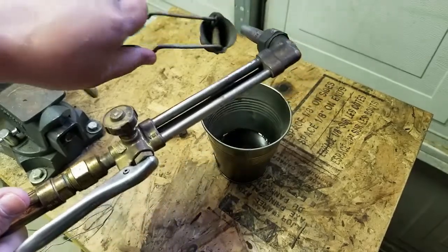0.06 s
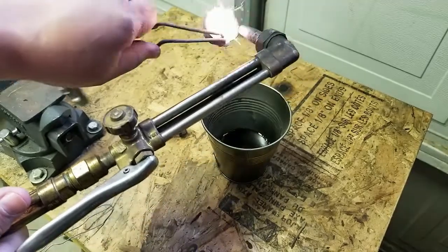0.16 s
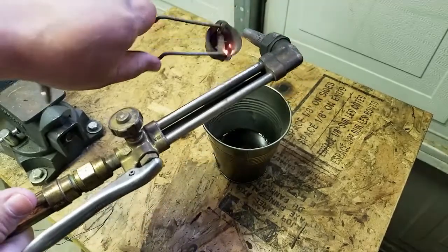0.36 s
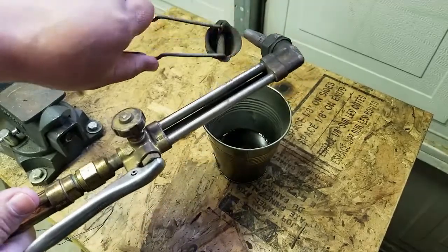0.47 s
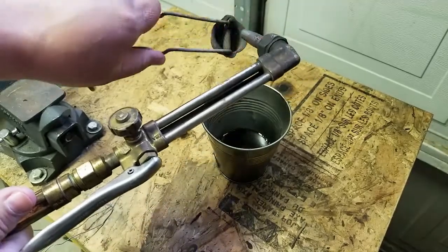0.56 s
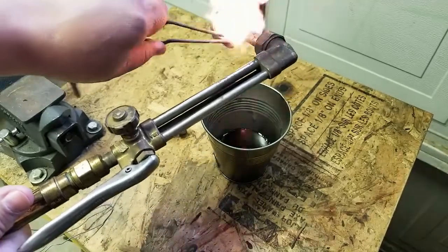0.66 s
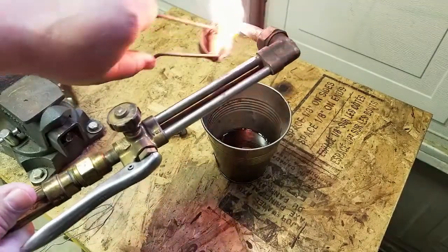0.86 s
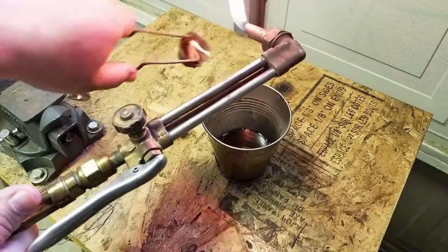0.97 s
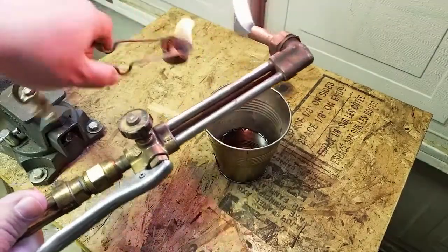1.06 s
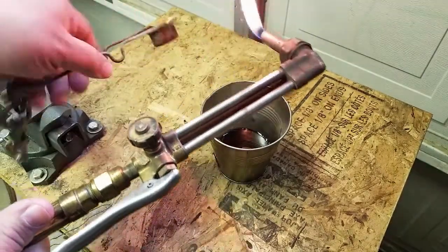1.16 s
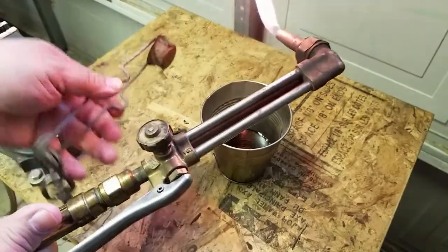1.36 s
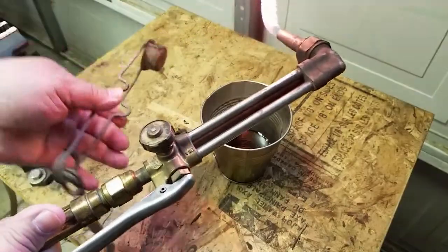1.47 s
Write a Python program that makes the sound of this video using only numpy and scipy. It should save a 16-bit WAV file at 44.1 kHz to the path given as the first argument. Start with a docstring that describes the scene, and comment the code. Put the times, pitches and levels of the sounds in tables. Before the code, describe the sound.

A flint striker scrapes and springs back twice with sharp, ringing metallic clicks. The second squeeze lights a faintly hissing gas torch with a soft puff, then the striker rattles lightly, close by in a workshop.

```python
"""A flint striker, squeezed and released twice at the tip of a gas torch over a workshop bench.
Each stroke drags the flint across a small file; the cup and wire handle ring where the flint catches.
The second squeeze lights the hissing gas with a soft puff, and the striker rattles as it is drawn away.
Heard close on a stereo pair, a little left of centre, with bench reflections and low room tone behind."""
import sys
import numpy as np
from scipy import signal
from scipy.fft import rfft, irfft
from scipy.io import wavfile

SR = 44100
rng = np.random.default_rng(int(sys.argv[2]) if len(sys.argv) > 2 else 0)


def transcribe(u):
    """Save the signal u as a 16-bit wav file named by the first command-line argument.

    u: samples, shape (n,) or (channels, n), limited to [-1, 1]; the rate is SR.
    q: integer samples, one column per channel.
    """
    v = np.clip(np.atleast_2d(u).T, -1, 1)
    q = np.round(v * 32767).astype(np.int16)
    wavfile.write(sys.argv[1], SR, q)


N = 66150
T = np.arange(N) / SR

# spectrum of small flint and steel contacts (frequency [Hz], level [dB])
CONTACT_SPECTRUM = [(200, -32), (1200, -21.5), (2500, -11), (4300, -2.5), (6200, -3.5), (8000, 0),
                    (10500, -3), (12200, 1.5), (15700, -1)]


def amp(db):
    """Decibels to gain."""
    return 10 ** (np.asarray(db) / 20)


def unit(x):
    """Scales to rms 1."""
    return x / np.sqrt(np.mean(x ** 2) + 1e-20)


def read(points, hz):
    """Interpolates a table on a log-frequency axis."""
    f, value = np.transpose(points)
    return np.interp(np.log(hz + 1), np.log(f + 1), value)


def level(points):
    """Gain over time from a dB curve."""
    return amp(np.interp(T, *np.transpose(points)))


def add(mix, start_s, sound):
    """Mixes a sound in at a time."""
    part = mix[round(start_s * SR):][:len(sound)]
    part += sound[:len(part)]


def colour(x, spectrum, size=4096):
    """Applies a causal filter of unit energy with the given spectrum."""
    log_gain = np.log(amp(read(spectrum, abs(np.fft.fftfreq(size, 1 / SR)))))
    minimum_phase = np.exp(np.conj(signal.hilbert(log_gain)))
    taps = np.fft.ifft(minimum_phase).real[:size // 2]
    return signal.fftconvolve(x, taps / np.linalg.norm(taps))[:len(x)]


def noise(spectrum):
    """Steady coloured noise of rms 1."""
    gain = amp(read(spectrum, np.fft.rfftfreq(N, 1 / SR)))
    return unit(irfft(rfft(rng.standard_normal(N)) * gain, N))


def resonate(x, hz, width_hz, stages=1):
    """Passes a sound through equal resonances in series, each of gain 1."""
    r = np.exp(-np.pi * width_hz / SR)
    for _ in range(stages):
        x = 2 * signal.lfilter([1 - r], [1, -r * np.exp(2j * np.pi * hz / SR)], x).real
    return x


def room_tone(side_db=-22):
    """Low rumble of the workshop, nearly the same at both microphones."""
    # colour of the rumble (frequency [Hz], level [dB])
    spectrum = [(20, -10.5), (42, -7.5), (62, 4.5), (95, -3), (130, -4), (180, -12.5), (260, -14.5),
                (400, -32.5), (900, -31.5), (3000, -53.5)]
    # its rise and fall (time [s], level [dB])
    swell = [(0, -53.5), (.13, -56.5), (.19, -50.5), (.3, -52.5), (.6, -63.5), (.85, -59.5), (1.0, -65.5),
             (1.15, -69.5), (1.29, -60.5), (1.5, -66.5)]
    mid = noise(spectrum)
    side = amp(side_db) * noise(spectrum) * np.array([[1], [-1]])
    return (mid + side) * level(swell)


def workshop(x, bench_db=1, bench_decay_s=.0045, room_db=-5.5, room_onset_s=.007):
    """Reflections at one microphone: quick ones from the bench, then the room's tail."""
    # decay of the room (frequency [Hz], t60 [s])
    decay = [(100, .4), (800, 0.21), (2500, 0.23), (5500, .29), (9000, .26), (15000, 0.15)]
    t = T[:SR // 2]
    taps = rng.choice([-1, 1], len(t)) * (rng.random(len(t)) < 1 / 8)
    bench = taps * np.exp(-t / bench_decay_s) * (t > 1 / 2000)
    hz, age, bands = signal.stft(rng.standard_normal(len(t)), SR, nperseg=256)
    bands *= amp(-60 * age / read(decay, hz)[:, None])
    tail = signal.istft(bands, SR, nperseg=256)[1][:len(t)]
    tail *= 1 - np.exp(-(t / room_onset_s) ** 2)
    echo = amp(bench_db) * bench / np.linalg.norm(bench) + amp(room_db) * tail / np.linalg.norm(tail)
    return signal.fftconvolve(x, echo)[:N]


def moving_reflections(x, cycle_hz=9, sets=3):
    """The reflections change as the hand moves: the sound fades round a few sets of them."""
    shares = [np.maximum(np.cos(2 * np.pi * (cycle_hz * T + k / sets)), 0) for k in range(sets)]
    return sum(workshop(x * share) for share in shares / np.linalg.norm(shares, axis=0))


def gas_hiss():
    """Gas leaves the torch tip with a faint hiss and two fuzzy whistles."""
    # colour of the jet (frequency [Hz], level [dB])
    spectrum = [(300, 2), (600, -0.5), (1000, -2), (2000, -10.5), (2650, 5), (3200, -10.5), (4200, 2),
                (5900, 3.5), (7000, -6.5), (8600, -9), (9700, -7.5), (11000, -14), (15700, -20)]
    # the hiss ducks after the loud strokes and slowly recovers, as under automatic gain control
    # (time [s], level [dB])
    ducking = [(0, -65.5), (.15, -66), (.4, -71.5), (.62, -74), (1.0, -72), (1.15, -74), (1.35, -70),
               (1.5, -71)]
    # nozzle whistles (frequency [Hz], width per stage [Hz], level against the hiss [dB])
    tones = [(2638, 90, -16), (9868, 130, -7.5)]
    whistles = sum(amp(db) * unit(resonate(rng.standard_normal(N), hz, width_hz, stages=2))
                   for hz, width_hz, db in tones)
    return (noise(spectrum) + whistles) * level(ducking)


def ignition_puff(start_s=.703, rise_s=.017, hold_s=.036, fall_s=.0065, db=-41.5):
    """The cloud of gas burns off in a short turbulent flutter."""
    # colour of the puff (frequency [Hz], level [dB])
    spectrum = [(25, -15), (60, 1), (95, -6.5), (135, 6.5), (185, -10.5), (270, -1.5), (400, -11),
                (600, -15), (900, -16.5), (2000, -57), (6000, -57)]
    t = T - start_s
    swell = np.clip(t / rise_s, 0, 1) * np.exp(-np.maximum(t - rise_s - hold_s, 0) / fall_s)
    return amp(db) * unit(noise(spectrum) * swell) * np.sqrt(np.mean(swell ** 2))


def settling_flame():
    """The new flame flutters low and fades as it settles."""
    # colour of the flame (frequency [Hz], level [dB])
    spectrum = [(60, -9.5), (170, -10.5), (280, 2), (420, -5.5), (600, -4), (900, -13.5), (2000, -30.5)]
    # its swell and fade (time [s], level [dB])
    swell = [(.70, -100), (.75, -62), (.85, -65), (.90, -78), (1.05, -93)]
    return noise(spectrum) * level(swell)


def rasp(force, spectrum, clicks_per_s=4500, spread_db=3.5):
    """Rough surfaces rub: dense uneven clicks that follow the force of the stroke."""
    sizes = amp(spread_db * np.minimum(rng.exponential(1, N), 4))
    clicks = sizes * rng.choice([-1, 1], N) * (rng.random(N) < clicks_per_s / SR)
    return colour(unit(clicks) * level(force), spectrum)


def loose_rattle(tick_decay_s=.0015, ring_db=17):
    """Drawn away, the loose flint arm ticks and rings thinly, and the arms slide against each other."""
    # light contacts of the arm (time [s], level [dB])
    contacts = [(1.0459, -50.5), (1.16, -60), (1.232, -48.5), (1.242, -40), (1.2939, -43), (1.319, -55.5)]
    # force of the sliding arms (time [s], level [dB])
    slide_force = [(1.0, -100), (1.19, -90), (1.225, -71), (1.236, -51.5), (1.27, -57.5), (1.285, -65),
                   (1.325, -65.5), (1.38, -108)]
    # colour of their rubbing (frequency [Hz], level [dB])
    slide_spectrum = [(200, -28.5), (1200, -15.5), (2100, -6.5), (3000, -5.5), (4400, 3.5), (6200, -2.5),
                      (8000, 1.5), (10500, -6.5), (12500, -1.5), (15700, -4.5)]
    ticks, t = np.zeros(N), T[:SR // 30]
    for start_s, db in contacts:
        add(ticks, start_s, amp(db) * rng.standard_normal(len(t)) * np.exp(-t / tick_decay_s))
    arm_ring = amp(ring_db) * resonate(ticks, hz=12060, width_hz=25)
    return colour(ticks, CONTACT_SPECTRUM) + arm_ring + rasp(slide_force, slide_spectrum)


def steel_ring(drive):
    """The striker rings on in its modes, at the same rms as the sound that shakes it."""
    # modes of the steel (frequency [Hz], level [dB], t60 [s])
    modes = [(790, 0, .25), (986, -2, .3), (1130, -2, .1), (2482, -6.5, .18), (2828, -2, .17),
             (3270, -1, .2), (3835, 3, .14), (6680, 1, 0.15), (6950, 0, 0.15), (7635, -5, 0.14),
             (7845, -8, .17), (8310, -4, .2), (12280, 1, .15), (13470, 4, .17)]
    t = T[:SR // 3]
    ring = sum(amp(db - 60 * t / t60) * np.sin(2 * np.pi * (hz * t + rng.random()))
               for hz, db, t60 in modes)
    return unit(signal.fftconvolve(drive, ring)[:N]) * np.std(drive)


def chatter(length_s, hz, width_hz, roughness=.61):
    """A brief stick-slip squeak swells and dies inside one resonance of the striker."""
    t = T[:SR // 40]
    grip = np.sin(np.pi * np.minimum(t / length_s, 1))
    phase_wander = np.cumsum(rng.standard_normal(len(t))) * np.sqrt(np.pi * width_hz / 2 / SR)
    tone = np.sin(2 * np.pi * hz * t + phase_wander)
    slips = (1 - roughness) * tone + roughness * rng.standard_normal(len(t))
    squeak = resonate(grip * slips, hz, 2 * width_hz, stages=2)
    return squeak / np.linalg.norm(squeak) * np.sqrt(length_s * SR)


def flint_catches(crack_db=-2, crack_decay_s=.00055):
    """Each catch shakes the cup and the wire, with a short crackle as the flint lets go."""
    # catches on the file (time [s], length [s], cup level [dB], wire level [dB], wire pitch [Hz])
    catches = [(0.1746, 0.0045, -44.5, -43.5, 7400), (.201, 0.0063, -26, -44.5, 7800),
               (0.243, .006, -46.5, -33, 7900), (0.2473, 0.0098, -43.5, -33.5, 7900),
               (0.3543, 0.0072, -25.5, -38, 7900), (.360, 0.0096, -27.5, -36, 7800),
               (0.3688, .0028, -31.5, -19, 7950), (0.38, .0025, -41.5, -30, 8000),
               (.676, 0.014, -43, -52.5, 7400), (.7035, 0.0046, -32.5, -36, 7250),
               (0.728, .003, -46.5, -26.5, 7150), (.8497, .0025, -43, -39.5, 7200),
               (0.8537, 0.0023, -43.5, -30, 8050)]
    squeaks, cracks, t = np.zeros(N), np.zeros(N), T[:SR // 50]
    for start_s, length_s, cup_db, wire_db, wire_hz in catches:
        cup = amp(cup_db) * chatter(length_s, hz=3127, width_hz=890)
        wire = amp(wire_db) * chatter(length_s, wire_hz, width_hz=610)
        add(squeaks, start_s, cup + wire)
        crack = amp(wire_db + crack_db) * rng.standard_normal(len(t)) * np.exp(-t / crack_decay_s)
        add(cracks, start_s + length_s / 2, crack)
    return squeaks + colour(cracks, CONTACT_SPECTRUM)


def flint_strokes():
    """File teeth chip the flint on each squeeze and again as the handle springs back."""
    # force of the flint on the file in the two squeezes (time [s], level [dB])
    squeeze_force = [(.14, -77), (.175, -46), (.196, -36), (.209, -27), (.228, -34.5), (.256, -35),
                     (.275, -42.5), (.31, -59.5), (.33, -90), (.635, -81), (.678, -44), (.702, -48),
                     (.732, -37), (.765, -61.5), (.79, -83.5)]
    # colour of a squeeze (frequency [Hz], level [dB])
    squeeze_spectrum = [(100, -22), (250, -9.5), (520, -13), (1000, -3), (1350, -10.5), (2000, -3.5),
                        (2700, 2.5), (3800, 3.5), (4800, -1), (6500, -1.5), (8200, 1.5), (9300, -4.5),
                        (11000, -1.5), (12500, 3.5), (15700, -2.5)]
    # force in the two returns (time [s], level [dB])
    return_force = [(.32, -80), (.342, -41), (.350, -41), (.357, -26.5), (.371, -22.5), (.379, -45),
                    (.41, -91), (.812, -73.5), (.832, -40), (.856, -32.5), (.87, -51.5), (.90, -88.5)]
    # colour of a return (frequency [Hz], level [dB])
    return_spectrum = [(100, -30.5), (300, -19.5), (550, -21.5), (850, -9.5), (1130, -2), (1350, -9),
                       (1650, -1), (2000, -5), (2700, 3), (3900, 1.5), (4800, -2), (8200, 1), (9300, -3),
                       (11000, -5.5), (12500, 7.5), (13500, 4.5), (15700, -4)]
    return rasp(squeeze_force, squeeze_spectrum) + rasp(return_force, return_spectrum)


def place_left(pair, lead_s=.00003):
    """The sound reaches the left microphone slightly earlier and with more treble."""
    # balance of the pair (frequency [Hz], left minus right [dB])
    balance = [(200, 0), (1000, 0), (2500, 3), (4000, 1.5), (5500, 1), (7200, 6.5), (8400, 1), (10000, 1.5),
               (12500, -0.5), (15500, 9)]
    hz = np.fft.rfftfreq(N, 1 / SR)
    lean = amp(read(balance, hz) / 2) * np.exp(1j * np.pi * hz * lead_s)
    return irfft(rfft(pair) * np.array([lean, 1 / lean]), N)


def scene(stroke_ring_db=-13.5, rattle_ring_db=-13, catch_send_db=-6, rattle_send_db=1, flame_send_db=-13):
    """Striker and torch close to the pair; each side gets its own ring, reflections and hiss."""
    scrape = flint_strokes()
    squeaks = flint_catches()
    rattle = loose_rattle()
    flame = ignition_puff() + settling_flame()
    direct = scrape + squeaks + rattle + flame
    send = scrape + amp(catch_send_db) * squeaks + amp(rattle_send_db) * rattle
    send += amp(flame_send_db) * flame
    pair = []
    for _ in range(2):
        ring = amp(stroke_ring_db) * steel_ring(scrape + squeaks / 2)
        ring += amp(rattle_ring_db) * steel_ring(rattle)
        pair.append(direct + ring + moving_reflections(send) + gas_hiss())
    return place_left(np.array(pair)) + room_tone()


def record(dry):
    """The recorder's band limit takes off the highest treble."""
    edge_hz = 15800
    lowpass = signal.firwin(511, edge_hz, window=("kaiser", 8), fs=SR)
    return signal.oaconvolve(dry, lowpass[None], "same")


dry = scene()
out = record(dry)
transcribe(out)
```